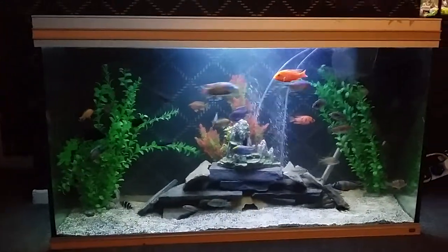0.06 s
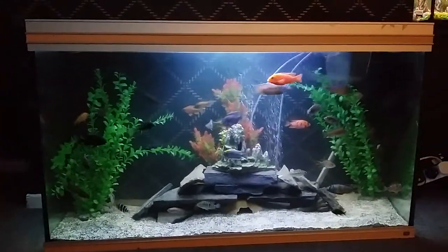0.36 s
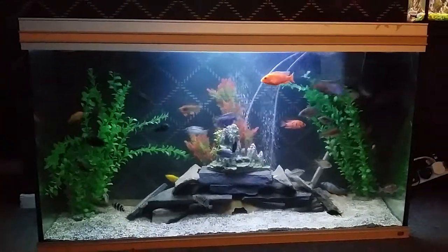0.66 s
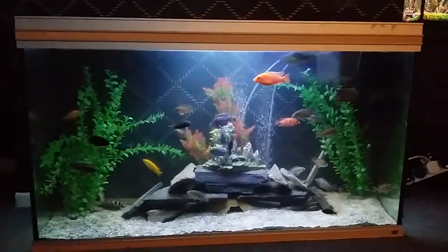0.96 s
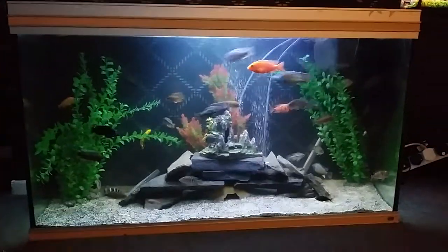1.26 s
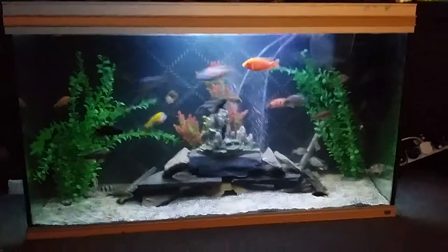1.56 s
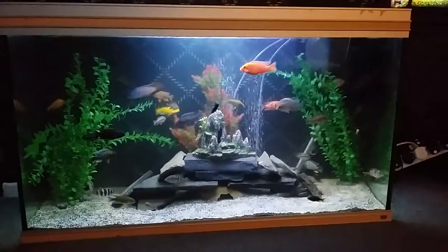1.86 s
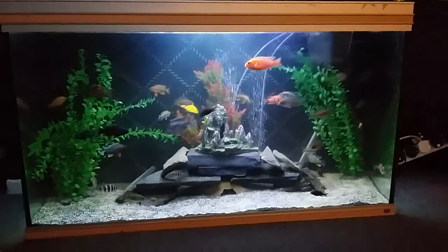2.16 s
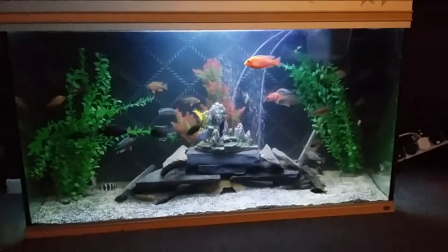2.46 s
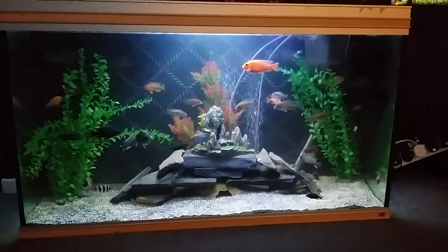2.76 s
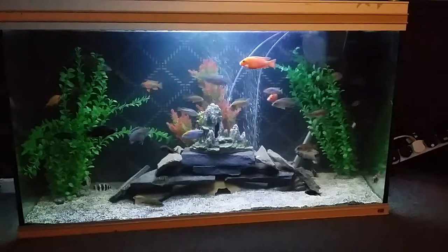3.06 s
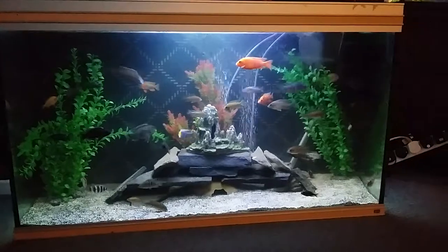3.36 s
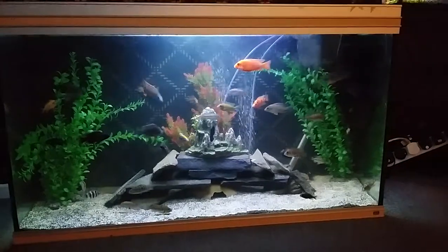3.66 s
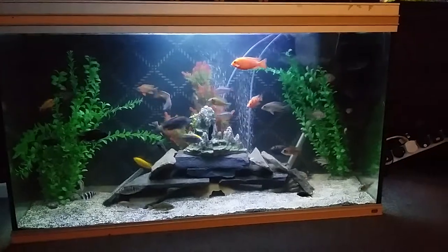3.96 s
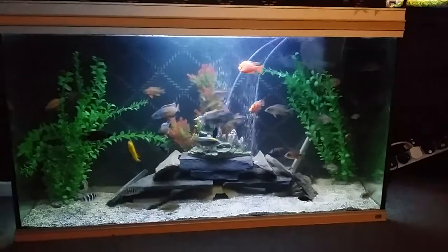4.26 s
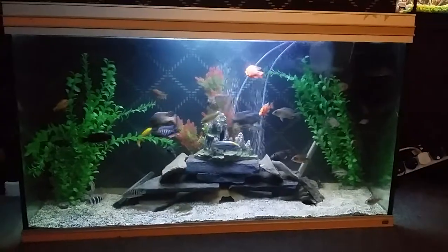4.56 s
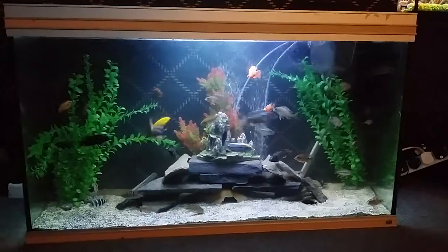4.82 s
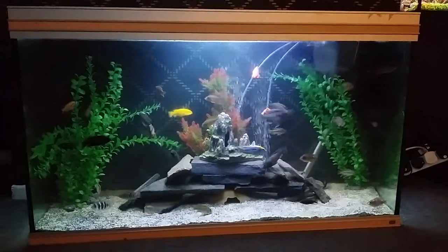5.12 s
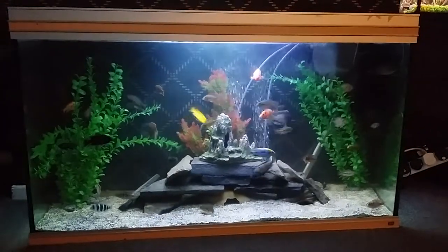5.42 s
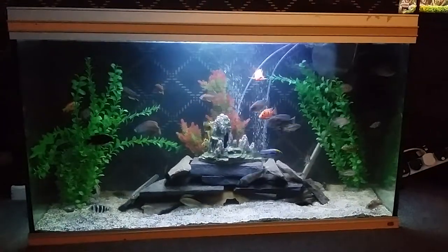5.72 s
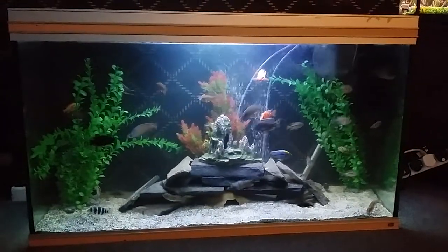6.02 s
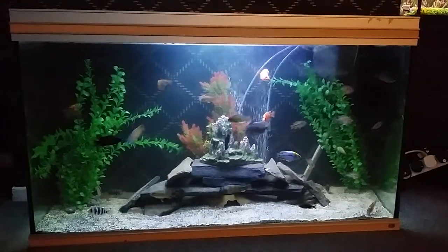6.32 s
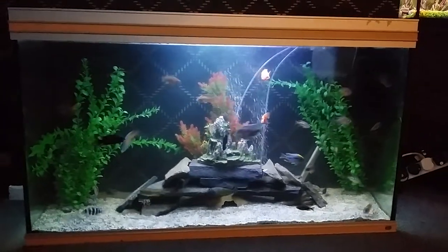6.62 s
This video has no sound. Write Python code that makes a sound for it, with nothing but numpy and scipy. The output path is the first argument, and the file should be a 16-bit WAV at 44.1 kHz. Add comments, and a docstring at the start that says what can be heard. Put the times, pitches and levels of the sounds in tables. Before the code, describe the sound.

Faint fish tank bubbling and pump hum indoors, with wooden clicks, a short scrape and one loud, sharp snap nearby.

```python
"""A fish tank in a quiet living room: its air pump hums, the airstone fizzes with tiny bursting
bubbles, a few pop or ping, and pockets of air gulp softly about once in 1.2 s.
Nearby something wooden, perhaps a cupboard door, knocks, slides in tiny slips and snaps shut on a
ringing metal catch; a few dull thumps follow.
The loud snap makes an automatic gain control duck everything for over a second."""
import sys
import numpy as np
from scipy import signal
from scipy.fft import rfft, irfft, next_fast_len
from scipy.io import wavfile
from scipy.ndimage import uniform_filter1d, minimum_filter1d

SR = 44100
rng = np.random.default_rng(int(sys.argv[2]) if len(sys.argv) > 2 else 0)


def waveform_to_disk(signal):
    """Save audio, clipped to [-1, 1], as 16-bit WAV at the path in sys.argv[1]."""
    frames = np.transpose(np.atleast_2d(signal))
    scaled = np.clip(frames, -1, 1) * 32767
    samples = np.round(scaled).astype(np.int16)
    wavfile.write(sys.argv[1], SR, samples)


N = 294923
TIME = np.arange(N) / SR

# resonances of the wooden door: pitch_hz, width_hz, gain_db
WOOD_MODES = [(224, 61, -4), (340, 140, -9.5), (622, 130, -5.5), (788, 99, -3.5), (973, 120, -3.5),
              (1167, 110, 4), (1454, 170, 0), (1714, 180, 3.5), (2240, 550, 2), (3200, 330, 5),
              (3478, 240, 7), (4270, 780, 0), (5800, 2100, -5)]


def from_db(db):
    """Decibels to gain."""
    return 10 ** (np.asarray(db) / 20)


def rms_one(x):
    """Scale to rms 1."""
    return x / np.sqrt(np.mean(x ** 2) + 1e-20)


def at_hz(points, size):
    """A curve over log frequency, read at the bins of an FFT of this size."""
    hz, value = np.transpose(points)
    return np.interp(np.log(np.arange(size // 2 + 1) * SR / size + 1), np.log(hz), value)


def butter(x, hz, kind, order=2):
    """Low-pass or high-pass filter."""
    return signal.sosfilt(signal.butter(order, min(hz, SR * .45), kind, fs=SR, output="sos"), x + 1e-18)


def resonance(x, hz, width_hz):
    """Two-pole resonator with gain 1 at its peak."""
    r = np.exp(-np.pi * width_hz / SR)
    feedback = [1, -2 * r * np.cos(2 * np.pi * hz / SR), r * r]
    return signal.lfilter(np.array([1, 0, -1]) * (1 - r * r) / 2, feedback, x + 1e-18)


def body(x, modes):
    """A ringing body: parallel resonators of alternating polarity."""
    return sum((-1) ** k * from_db(db) * resonance(x, hz, width)
               for k, (hz, width, db) in enumerate(modes))


def click(start_s, db):
    """One impulse."""
    out = np.zeros(N)
    out[round(start_s * SR)] = from_db(db)
    return out


def envelope(age, attack_s, length_s, release_s):
    """Linear attack, hold until length_s, exponential release."""
    return np.clip(age / attack_s, 0, 1) * np.exp(-np.maximum(age - length_s, 0) / release_s)


def drift(per_s):
    """Slow random modulation of rms 1."""
    knots = rng.standard_normal(400)
    return rms_one(np.interp(TIME * per_s % 399, np.arange(400), knots))


def diffuse(pair, colour):
    """Two unrelated signals become a coloured stereo field, narrow in the low mids, wide on top."""
    # likeness of left and right: frequency_hz, correlation
    likeness = [(60, -0.27), (120, 1), (250, 0.94), (450, .8), (800, .45), (1300, 0.029), (2000, -0.074),
                (3400, 0.06), (6000, 0.13)]
    length = pair.shape[1]
    size = next_fast_len(length)
    mid, side = rfft(pair, size) * from_db(at_hz(colour, size))
    alike = np.clip(at_hz(likeness, size), -1, 1)
    stereo = np.sqrt(1 + alike) * mid + np.sqrt(1 - alike) * side * [[1], [-1]]
    return rms_one(irfft(stereo, size)[:, :length])


def direct(x, lag_s=0.00022, pan_db=-1):
    """The straight path reaches the right microphone a little later and louder."""
    return np.array([x * from_db(pan_db / 2), np.interp(TIME - lag_s, TIME, x) * from_db(-pan_db / 2)])


def room(x, t60_s=0.29, bass_t60_s=0.72, bass_db=-14, build_s=0.00092, early_db=5, early_s=0.003):
    """Close surfaces answer first, then a short dense reverb; the bass rings longer."""
    # tone of the reverb: frequency_hz, gain_db
    colour = [(100, -6.5), (250, -0.5), (600, 4), (1500, -0.5), (3200, -3.5), (6900, 0), (15000, -2.5)]
    t = TIME[:SR // 2]
    noise = diffuse(rng.standard_normal((2, len(t))), colour)
    tail = noise * (from_db(-60 * t / t60_s) + from_db(early_db) * np.exp(-t / early_s))
    bass = butter(noise, 300, "low") * from_db(-60 * t / bass_t60_s)
    response = (tail + from_db(bass_db) * bass) * (1 - np.exp(-t / build_s))
    return signal.fftconvolve(x[None], rms_one(response) / np.sqrt(len(t)), axes=1)[:, :N]


def pump(mains_hz=50.05, rumble_db=-54, side_db=-11):
    """The diaphragm hums at multiples of the mains; the stirred water rumbles in the tank."""
    # partials of the hum: mains_multiple, level_db
    partials = [(1, -69.5), (2, -56), (3, -67), (4, -75.5), (5, -77), (7, -74.5), (8, -65), (9, -79.5),
                (14, -70), (18, -68.5)]
    # tank resonances, stirred by the rising air: pitch_hz, width_hz, level_db
    tank_modes = [(70, 11, -64.5), (160, 18, -66), (208.3, 16, -64.5), (410, 48, -68), (776.5, 40, -62),
                  (922, 30, -70), (1011, 49, -63.5)]
    # low bed of pump, water and room: frequency_hz, gain_db
    rumble_colour = [(20, -33.5), (40, -27.5), (48, -6), (58, -1), (85, -3), (135, 0.5), (180, -3),
                     (240, 2), (290, -4), (500, -4), (1000, -16), (2000, -31), (7000, -35), (15800, -44.5)]
    hum = sum(from_db(db) * np.sqrt(2) * np.sin(2 * np.pi * (round(k) * mains_hz * TIME + rng.random()))
              for k, db in partials)
    stir = butter(rng.standard_normal((2, N)), 55, "high", order=6)
    mid, side = sum(from_db(db) * rms_one(resonance(resonance(stir, hz, width), hz, 4 * width))
                    for hz, width, db in tank_modes)
    tank = mid + from_db(side_db) * side * [[1], [-1]]
    return hum + tank + from_db(rumble_db) * diffuse(rng.standard_normal((2, N)), rumble_colour)


def airstone(level_db=-53, bubbles_per_s=5000, size_db=2, ring_q=32, swarm_db=3.5, bands=44):
    """Countless tiny bubbles merge into a hiss; larger ones swarm and ring at the pitch of their size."""
    # fizz of bursting bubbles: frequency_hz, gain_db
    colour = [(300, -30), (620, 2), (780, 4), (1020, 0), (1250, -1.5), (1700, -3.5), (2400, -1),
              (3300, -4.5), (4200, -7), (5000, -10), (5800, -19.5), (7200, -31), (15000, -54.5)]
    rings = np.zeros((2, N))
    for hz in np.geomspace(900, 5600, bands):
        births = np.zeros((2, N))
        swarm = from_db(swarm_db * np.minimum(drift(per_s=14), 2.8))
        when, size, side = rng.random((int(bubbles_per_s * N / SR / bands), 3)).T
        at = (when * N).astype(int)
        strength = swarm[at] * from_db(size_db * np.minimum(-np.log(1 - size), 3))
        births[:, at] = strength * [np.cos(2 * np.pi * side), np.sin(2 * np.pi * side)]
        rings += np.sqrt(hz) * rms_one(resonance(births, hz, hz / ring_q))
    hiss = diffuse(rng.standard_normal((2, N)), colour)
    return from_db(level_db) * rms_one(hiss + diffuse(rings, colour))


def gulps(attack_s=0.015, release_s=0.044):
    """A pocket of air breaks up into big bubbles: a short swell of hollow noise."""
    # air pockets: start_s, level_db
    pockets = [(0.461, -42), (1.68, -43), (2.908, -42), (4.076, -40.5), (5.261, -37.5), (6.539, -42)]
    # tone of a gulp: frequency_hz, gain_db
    colour = [(400, -27), (620, -10), (760, -3.5), (940, -5), (1100, -17), (1400, -25.5), (4000, -77)]
    swell = sum(from_db(db) * envelope(TIME - s, attack_s, attack_s, release_s) for s, db in pockets)
    return swell * diffuse(rng.standard_normal((2, N)), colour)


def knocks(top_hz, drive_db=15, spread_db=0.92, crack_db=-53.5, crack_db_per_octave=17.5):
    """Blows ring the wood, hard ones with a thin crack; returns the direct sound and the reverb send."""
    # blows on the wood: start_s, strength_db, low_cut_hz, brightness_hz, send_db
    blows = [(0.9835, -6, 145, 2650, -3.5), (0.9877, -5.5, 145, 1890, -9.5), (1.0011, -11, 300, 2600, -20),
             (1.6617, -0.5, 900, 5200, -3), (1.6725, -1.5, 700, 3630, -10), (1.809, -13.5, 585, 2480, 0.5),
             (2.043, -1, 750, 2400, -1.5), (2.34, -4.5, 644, 2640, -0.5), (2.3536, 3, 1100, 2050, -12),
             (2.457, -5, 1110, 2300, -4.5), (2.513, -15.5, 2000, 5200, -4.5),
             (2.5361, -2.5, 1100, 1700, -7.5), (4.4901, 4, 200, 5800, 7), (4.493, 1, 500, 5200, -11),
             (4.506, -4, 250, 2400, 8)]
    rings, cracks = 0, 0
    # each blow lands elsewhere and stirs the resonances differently
    spreads = spread_db * rng.standard_normal((len(blows), len(WOOD_MODES)))
    for (s, db, low_hz, bright_hz, send_db), spread in zip(blows, spreads):
        blow = click(s, db + drive_db)
        paths = from_db([[0], [send_db]])
        contact = butter(butter(blow, bright_hz, "low", order=3), low_hz, "high")
        modes = [(hz, width, gain + change) for (hz, width, gain), change in zip(WOOD_MODES, spread)]
        rings = rings + paths * body(contact, modes)
        hardness_octaves = np.log2(bright_hz / 2496)
        cracks = cracks + paths * blow * from_db(crack_db + crack_db_per_octave * hardness_octaves)
    crack = resonance(resonance(cracks, 11000, 4500), 11000, 6000)
    return butter(rings, top_hz, "low", order=4) + crack


def pops(drive_db=13, hz=4300, width_hz=2500, room_db=-3):
    """Single bubbles pop at the water surface with a thin, crisp tick."""
    # popping bubbles: start_s, strength_db
    bursts = [(1.3494, -44), (4.2125, -41), (4.318, -41.5), (4.3877, -34.5), (4.4315, -47)]
    ticks = from_db(drive_db) * resonance(sum(click(s, db) for s, db in bursts), hz, width_hz)
    return direct(ticks) + from_db(room_db) * room(ticks)


def sliding(slips_per_s=480, grain_db=5.5, hollow_db=-4, drag_db=-44.5, attack_s=0.06, release_s=0.021):
    """Uneven tiny slips shake the wood and the hollow behind it; a lighter push sounds brighter."""
    # four pushes: start_s, length_s, strength_db, lightness (0 to 1)
    pushes = [(1.52, 0.1, -39.5, 1), (1.889, 0.21, -31.5, 0.24), (2.149, .15, -30.5, 0.04),
              (2.377, .06, -34.5, 0.37)]
    # resonances of the hollow: pitch_hz, width_hz, gain_db
    hollow_modes = [(290, 210, -4), (750, 190, -1)]
    sizes = from_db(grain_db * np.minimum(rng.exponential(1, N), 3)) * rng.choice([-1, 1], N)
    slips = (rng.random(N) < slips_per_s / SR) * sizes
    hollow = body(np.roll(slips, SR // 200), hollow_modes)   # answers 5 ms later
    rub = body(slips, WOOD_MODES) + from_db(hollow_db) * hollow
    dull, bright = rms_one(butter(rub, 1750, "low")), rms_one(butter(rub, 4500, "low"))
    # a light drag carries on between the pushes
    first_s, last_s = pushes[0][0], pushes[-1][0]
    out = from_db(drag_db) * envelope(TIME - first_s, attack_s, last_s - first_s, release_s) * dull
    for s, length_s, db, lightness in pushes:
        texture = (1 - lightness) * dull + lightness * bright
        out = out + from_db(db) * envelope(TIME - s, attack_s, length_s, release_s) * texture
    return butter(out, 600, "high", order=1)


def catch(top_hz, drive_db=13):
    """The metal catch snaps with a short, bright ring."""
    # snaps: start_s, strength_db
    snaps = [(1.6616, 6), (1.6717, -19), (4.4905, 4)]
    # resonances of the metal: pitch_hz, width_hz, gain_db
    metal_modes = [(2339, 360, 2.5), (3093, 160, 1.5), (3200, 65, -0.5), (3530, 250, -2.5),
                   (3900, 2300, -5), (4600, 430, 4)]
    contact = butter(sum(click(s, db + drive_db) for s, db in snaps), 1200, "high")
    return butter(body(contact, metal_modes), top_hz, "low", order=6)


def door(direct_db=1, room_db=2, slide_db=-6, slide_direct_db=-4, catch_send_db=-4, top_hz=5300):
    """Knocks, slide and catch, each with its own balance of direct sound and reverb."""
    knock, knock_send = knocks(top_hz)
    rub = from_db(slide_db) * butter(sliding(), top_hz, "low")
    snap = catch(top_hz)
    straight = direct(knock + snap + from_db(slide_direct_db) * rub)
    reverb = room(knock_send) + from_db(catch_send_db) * room(snap) + room(rub)
    return from_db(direct_db) * straight + from_db(room_db) * reverb


def pings(swell_s=0.014, width_hz=170):
    """Larger bubbles burst with a brief narrow ring, soft-edged as if blurred by the room."""
    # ringing bubbles: peak_s, pitch_hz, level_db
    bubbles = [(2.81, 2940, -57), (3.4, 4660, -55.5), (4.02, 3000, -63), (4.29, 3020, -59.5),
               (6.25, 4620, -61), (6.449, 4630, -54.5)]
    out = 0
    for s, hz, db in bubbles:
        ring = rms_one(resonance(resonance(rng.standard_normal((2, N)), hz, width_hz), hz, 3 * width_hz))
        out = out + from_db(db) * np.exp(-.5 * ((TIME - s) / swell_s) ** 2) * ring
    return out


def thumps(drive_db=16, contact_hz=429.5, tick_db=-8, tick_growth=2.5, room_db=-3):
    """Soft heavy contacts, like steps on the floor; a faint tick grows faster than the thud."""
    # contacts: start_s, strength_db
    hits = [(4.7841, -4), (5.047, -14), (5.226, -17), (5.435, -12.5)]
    # resonances of the thud: pitch_hz, width_hz, gain_db
    thud_modes = [(163.3, 76, 8.5), (302, 210, 4.5), (624, 300, -10)]
    contact = butter(sum(click(s, db) for s, db in hits), contact_hz, "low")
    thud = from_db(drive_db) * body(contact, thud_modes)
    tick = resonance(sum(click(s, tick_db + tick_growth * db) for s, db in hits), 3800, 2360)
    return direct(thud + tick) + from_db(room_db) * room(thud + tick)


def scene():
    """The tank as a steady bed, with the door and thumps on top."""
    return pump() + airstone() + gulps() + pops() + pings() + door() + thumps()


def gain_control(x, threshold_db=-28, depth_db=17, hold_s=1.12, glide_s=0.32):
    """A loud, full-bodied blow ducks the gain; it is held down, then glides back."""
    power = np.mean(butter(x, 1200, "low") ** 2, axis=0)
    level_db = 10 * np.log10(np.abs(uniform_filter1d(power, SR // 12)) + 1e-12)
    cut_db = depth_db * np.clip(level_db - threshold_db, 0, 1)
    size = int(hold_s * SR) // 2 * 2 + 1
    held_db = -minimum_filter1d(-cut_db, size, origin=size // 2, mode="constant")
    r = np.exp(-1 / (glide_s * SR))
    return x * from_db(-signal.lfilter([1 - r], [1, -r], held_db))


def record(dry):
    """Two microphones of unlike colour, gain control, soft clipping and a steep high cut."""
    # left microphone over right: frequency_hz, balance_db
    balance = [(100, 0), (750, 1), (1240, -1), (2060, -4.5), (3400, -7), (4800, 8), (7800, -1.5),
               (12000, 1.5)]
    size = next_fast_len(N + SR // 10)
    mic_gains = from_db(at_hz(balance, size) * [[.5], [-.5]])
    heard = irfft(rfft(dry, size) * mic_gains, size)[:, :N]
    ducked = gain_control(heard)
    rounded = ducked / (1 + ducked ** 8) ** (1 / 8)
    return signal.sosfilt(signal.cheby2(16, 60, 16350, fs=SR, output="sos"), rounded)


dry = scene()
out = record(dry)
waveform_to_disk(out)
```